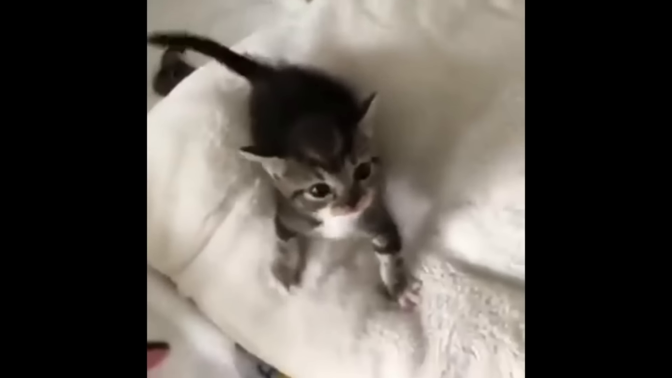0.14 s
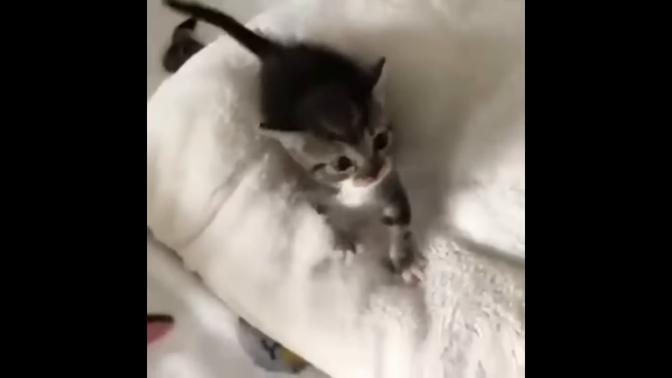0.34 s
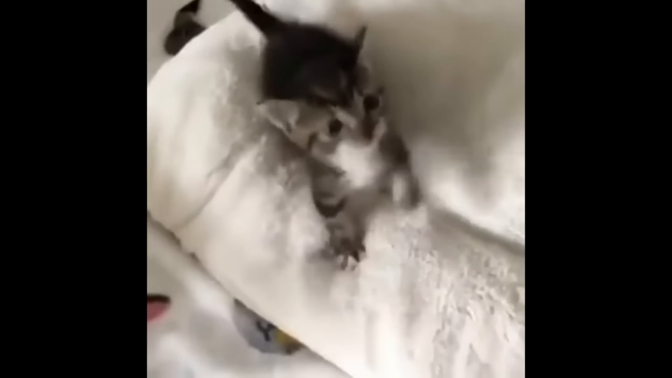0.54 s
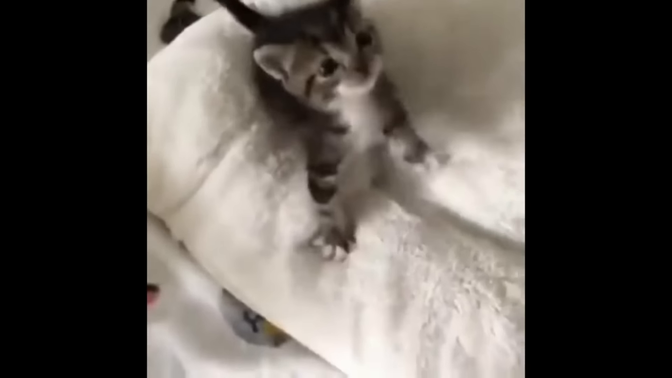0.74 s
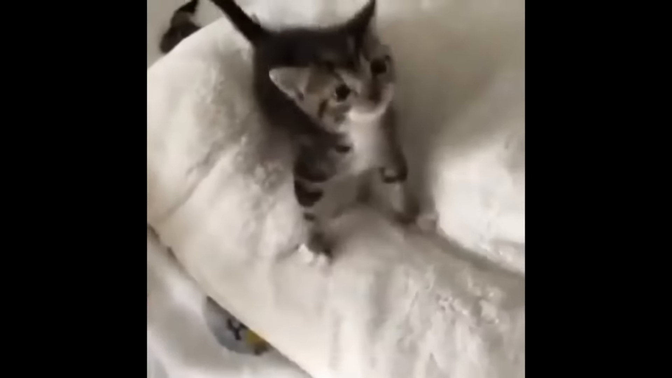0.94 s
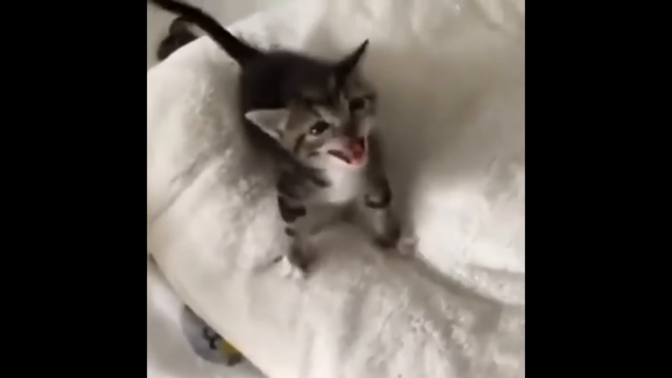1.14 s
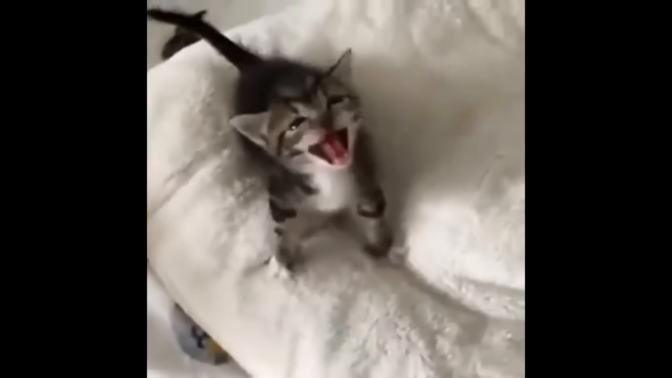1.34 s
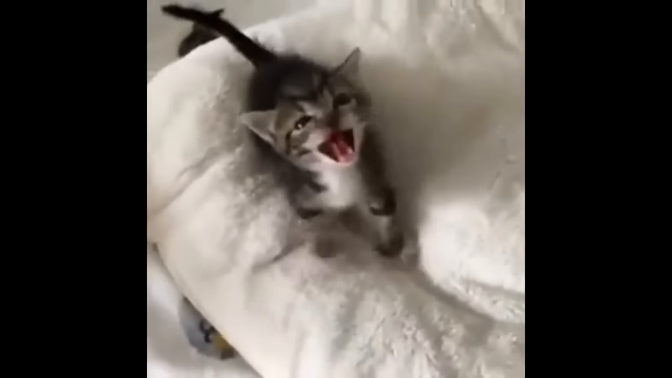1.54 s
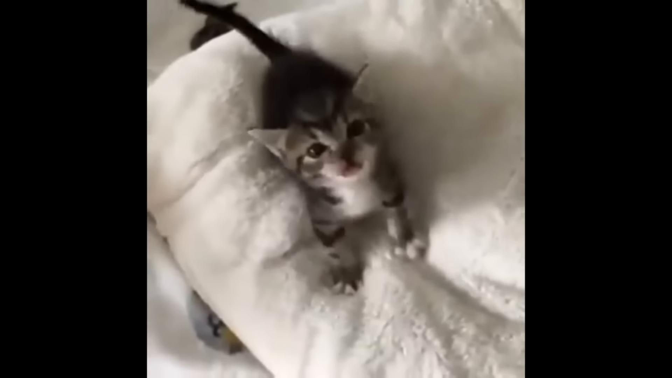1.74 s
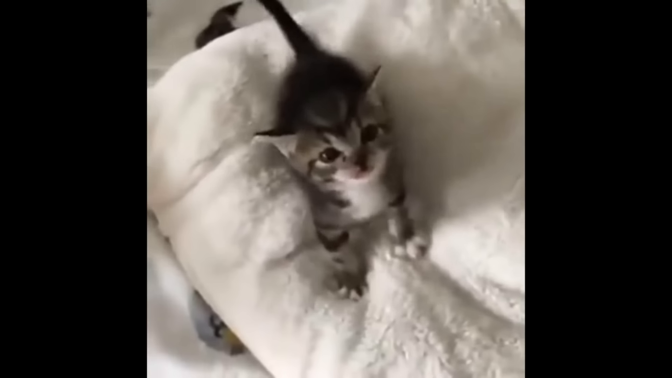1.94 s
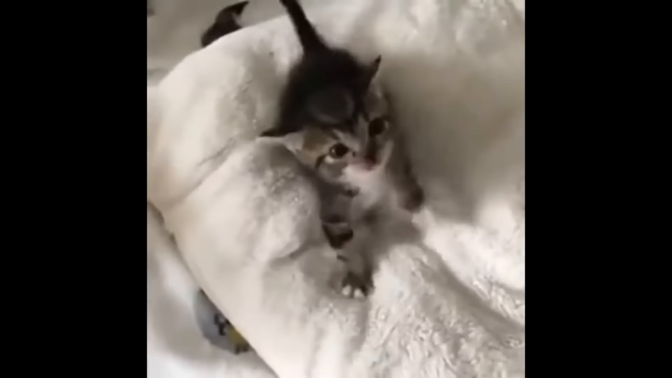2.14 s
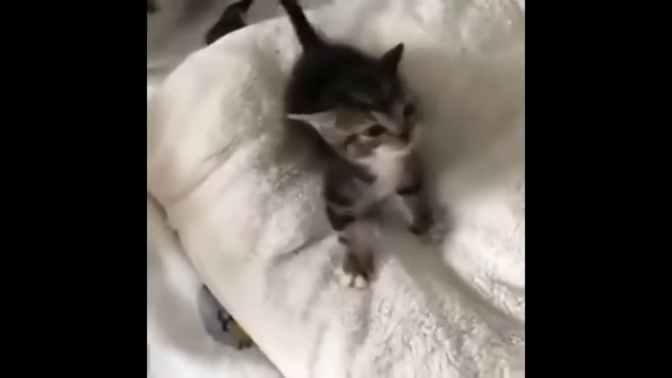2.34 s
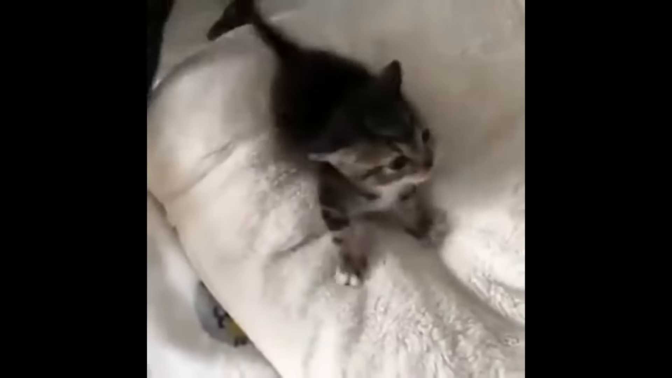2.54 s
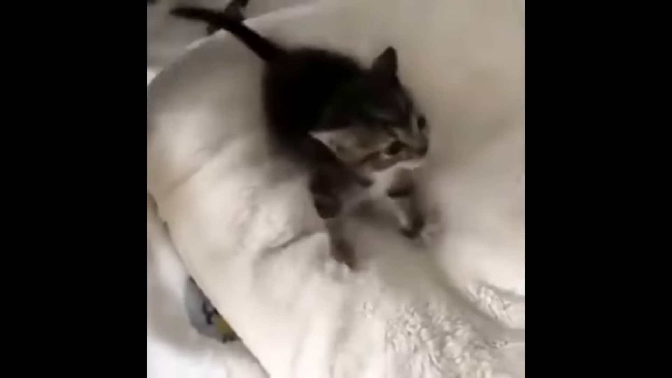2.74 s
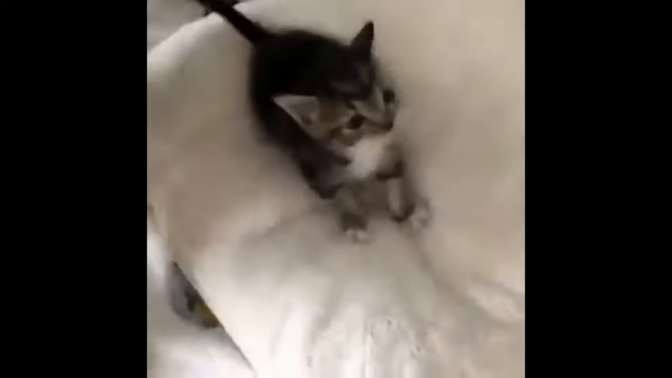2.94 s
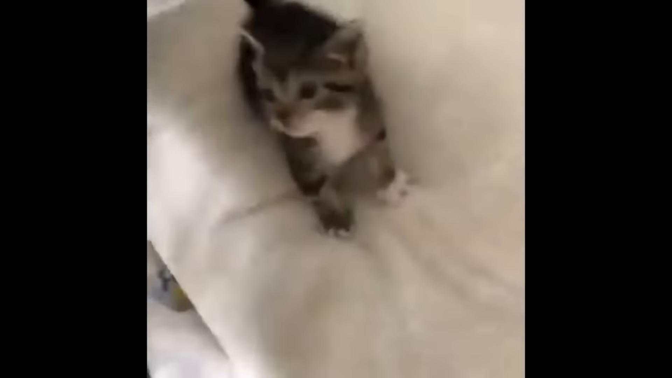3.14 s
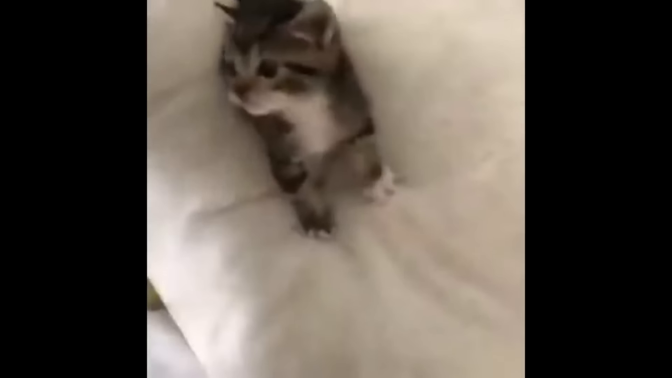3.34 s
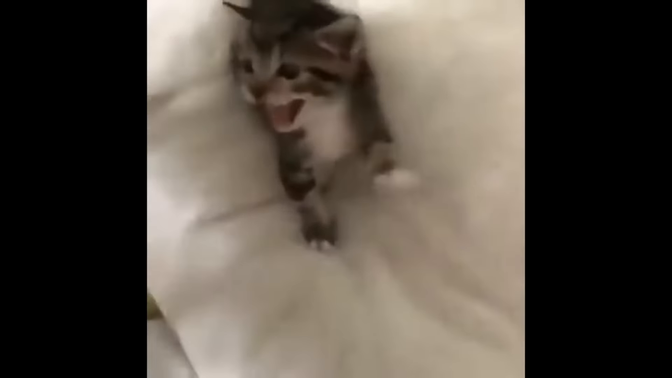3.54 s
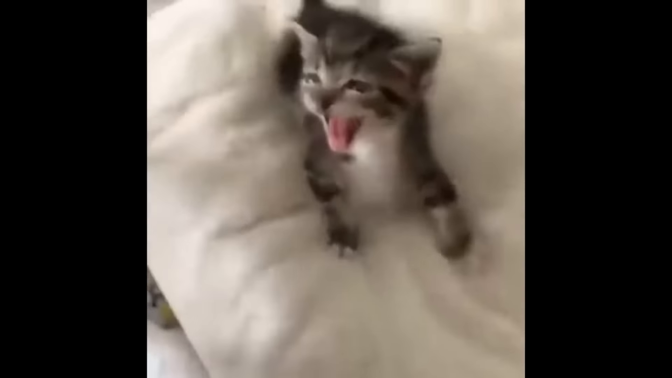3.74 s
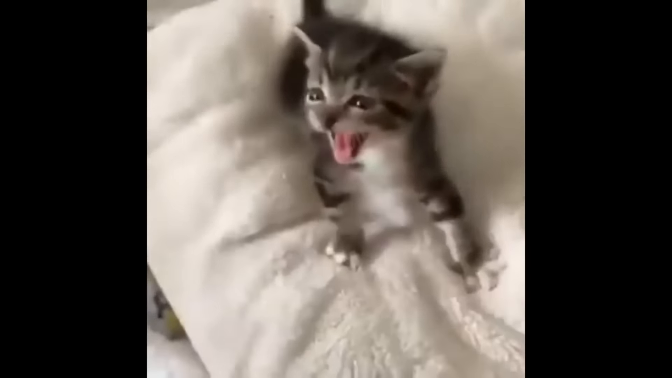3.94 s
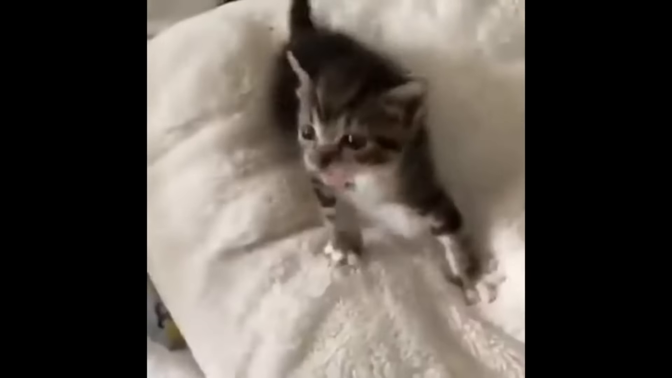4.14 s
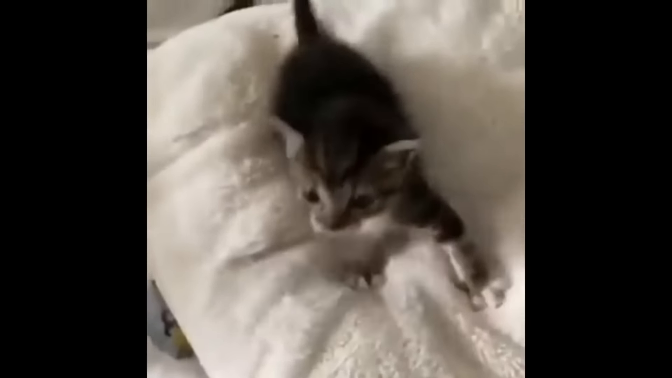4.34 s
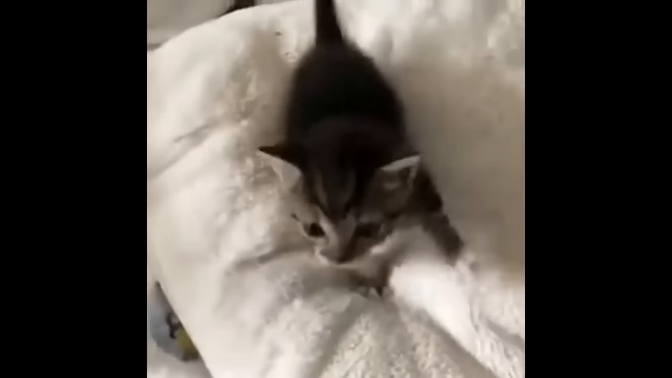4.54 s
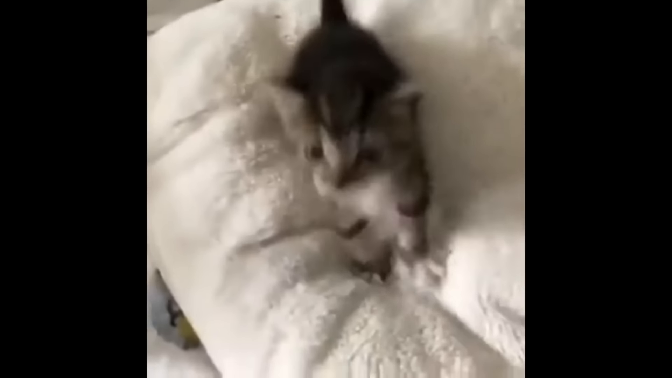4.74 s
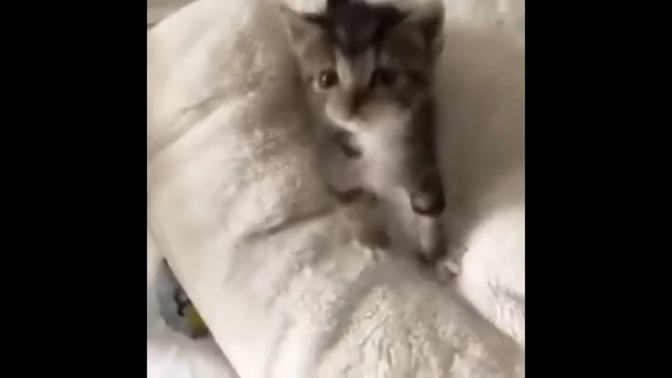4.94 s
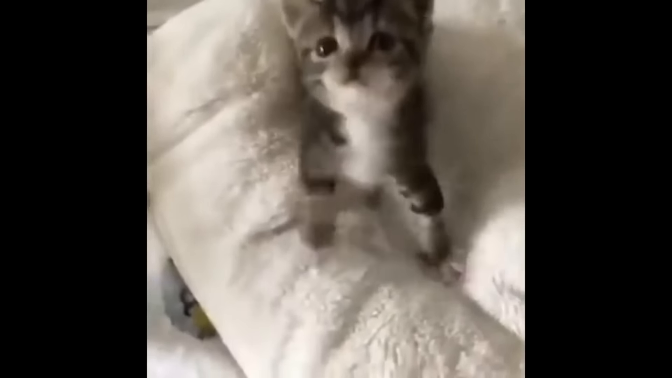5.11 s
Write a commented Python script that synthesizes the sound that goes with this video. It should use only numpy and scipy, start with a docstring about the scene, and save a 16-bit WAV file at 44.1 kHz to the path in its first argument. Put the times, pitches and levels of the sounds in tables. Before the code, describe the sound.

A young kitten gives three shrill high mews close by, the first faint and brief, over a wavering appliance hum in a quiet room.

```python
"""Three shrill mews of a young kitten are heard first and foremost, close by, in a quiet room with a humming appliance.
Harmonics of one unsteady pitch, weighted by throat and mouth, scoop up roughly, hold, dull as the jaw
closes and slide down; the first begins mid-note and the third cracks on the way. Thin, nearly steady
high tones sound during the mews; faint falling tones end and follow the first. Shaped noise gives the rasp,
the paws patting the bedding, claws ticking in the cloth, the room air and the swelling resonances of the hum."""
import sys
import numpy as np
from scipy import signal
from scipy.fft import rfft, irfft, next_fast_len
from scipy.io import wavfile
from scipy.ndimage import uniform_filter1d, minimum_filter1d, map_coordinates

SR = 44100
rng = np.random.default_rng(int(sys.argv[2]) if len(sys.argv) > 2 else 0)


def transcribe(u):
    """Save the signal u as a 16-bit wav file named by the first command-line argument.

    u: samples, shape (n,) or (channels, n), limited to [-1, 1]; the rate is SR.
    q: integer samples, one column per channel.
    """
    v = np.clip(np.atleast_2d(u).T, -1, 1)
    q = np.round(v * 32767).astype(np.int16)
    wavfile.write(sys.argv[1], SR, q)


N = 232583
TIME = np.arange(N) / SR  # s

# One row a mew: scoop_s, slide_s, widest_gape (0-1), jaw_lead_s (closing before the slide),
# accent_db (at the slide), rasp_delay_s (raspiest moment after the scoop), rasp_db
MEW_GESTURES = [(.06, .09, .8, .35, -6, 0.076, -46.5), (.054, .082, 0.81, 0.19, 9, .002, -34.5),
                (.076, .07, 0.97, 0.12, 1.5, 0.081, -28)]
# Pitch of the held note, one curve a mew: time_s, pitch_hz
HELD_PITCH = [
    [(0.0, 1707), (0.049, 1675.0), (0.066, 1697), (0.086, 1770), (0.135, 1787), (0.144, 1672),
     (0.16, 1638.0)],
    [(1.415, 1813), (1.423, 1795), (1.464, 1840), (1.476, 1763), (1.561, 1740), (1.642, 1734),
     (1.812, 1671), (1.845, 1638), (1.857, 1674.0), (1.897, 1644), (1.926, 1737), (1.958, 1647)],
    [(3.828, 1790), (3.848, 1825), (3.88, 1828), (3.901, 1558), (3.913, 1559), (3.949, 1698), (3.969, 1721),
     (4.021, 1711), (4.13, 1630), (4.235, 1679), (4.259, 1641), (4.34, 1611), (4.36, 1706)],
]
# Combined level of the overtones, one curve a mew: time_s, level_db
OVERTONE_EFFORT = [
    [(0.005, -15), (0.061, -13), (0.077, -20.5), (0.085, -38.5), (0.133, -40), (0.145, -23), (0.161, -35),
     (0.177, -44)],
    [(1.365, -48), (1.401, -29), (1.425, -28.5), (1.445, -17.5), (1.549, -11.4), (1.633, -11), (1.673, -13),
     (1.689, -13), (1.785, -16.5), (1.837, -10), (1.877, -29.5), (1.957, -48.5)],
    [(3.76, -38), (3.768, -48), (3.78, -25.5), (3.808, -32.0), (3.824, -20), (3.912, -7.5), (4.072, -8.5),
     (4.084, -11), (4.244, -22.2), (4.268, -19), (4.28, -32), (4.312, -41), (4.36, -47)],
]
# Fundamental as it moves through the lowest throat resonance: frequency_hz, level_db
THROAT_RESONANCE = [(1000, -42.5), (1350, -37.5), (1530, -32.5), (1630, -34), (1680, -30.5), (1715, -38),
                    (1750, -40), (1830, -34)]
# Overtone weighting of the wide mouth: frequency_hz, gain_db
WIDE_MOUTH = [(2000, -17), (3100, -13.5), (3450, -18), (3650, -12), (4100, 2.5), (5500, 0), (6280, 2.5),
              (6520, -10.5), (6650, -39.5), (6980, -36.5), (7300, -13.5), (7600, -45.5), (8850, -41),
              (9150, -20.5)]
# Overtone weighting of the nearly closed mouth: frequency_hz, gain_db
NARROW_MOUTH = [(2000, -4.5), (3320, 2), (3560, -16.5), (4950, -24), (5200, -29), (5350, -16), (6000, -40),
                (9200, -55)]
# Turbulence spectrum in the throat and mouth: frequency_hz, level_db
RASP_SPECTRUM = [(30, -23), (150, -6), (800, -6), (1500, -8), (2050, -7.5), (3900, -12.5), (4500, -11),
                 (5200, -5.5), (5800, -33.5), (6600, 3), (7300, 6.5), (7650, -15), (8600, 7.5), (9400, -45)]
# Hoarse air in one narrow resonance: middle_s, half_length_s, centre_hz, width_hz, level_db
HOARSE_STRETCHES = [(1.385, 0.025, 4650, 700, -41), (1.604, 0.11, 4510, 230, -38),
                    (3.816, 0.035, 4550, 697, -34), (3.905, 0.036, 7280, 282, -23.5),
                    (4.018, 0.092, 8260, 398, -38), (4.11, 0.099, 4100, 218, -44.5)]
# Thin high tones during the mews: start_s, held_s, first_hz, last_hz, level_db
HIGH_TONES = [(0, .16, 6716, 6716, -49.5), (.06, .09, 7190, 7260, -51), (1.465, 0.039, 7330, 7235, -23.5),
              (1.472, 0.23, 9050, 8870, -25.5), (1.49, .02, 6716, 6710, -27),
              (1.534, 0.26, 6710, 6717, -21.5), (1.535, .27, 8480, 8441, -35), (1.55, .11, 7200, 7245, -45),
              (3.891, .027, 8660, 8620, -23.5), (3.947, 0.08, 7061, 7061, -18),
              (3.951, 0.042, 8990, 8920, -32)]
# Faint falling tones, the first mew's second harmonic flaring as it slides, then a thin whine:
# peak_s, rise_s, fade_s, peak_pitch_hz, glide_hz_per_s, level_db
FALLING_TONES = [(.245, 0.025, 0.029, 1980, -15000, -43), (.58, 0.075, 0.25, 1579, -1350, -48)]
# Paws on the bedding: start_s, level_db, t60_s
PAW_PATS = [(1.45, -27, 0.46), (1.688, -35, 0.32), (3.89, -46, 0.45)]
# Spectrum of the bedding's dull give: frequency_hz, level_db
BEDDING_SPECTRUM = [(20, -24), (60, -15), (115, 0), (210, -2), (290, -22), (900, -45)]
# Claws catching in the cloth: middle_s, centre_hz, level_db
CLAW_TICKS = [(2.94, 6300, -52), (3.352, 6300, -44.5)]
# Decay of the room's tail: frequency_hz, t60_s
ROOM_DECAY = [(200, 0.48), (1700, 0.95), (3300, 0.5), (5000, 0.46), (9000, 0.09)]
# Resonances of the hum: centre_hz, width_hz, level_db, swell_share (0-1)
HUM_RESONANCES = [(156, 21, -64, .2), (346, 19, -59.5, 0.79), (420, 55, -60.5, 0.69),
                  (836.4, 45, -53, 0.96), (1614, 50, -61, 0.54)]
# Swelling and fading of the appliance's hum: time_s, level_db
HUM_SWELL = [(0.0, -0.5), (0.1, 9.5), (0.2, -5.5), (0.45, 6.3), (1.0, -5.5), (1.2, 3.5), (1.36, -8),
             (1.71, -4.5), (2.06, 2), (2.61, 0.8), (2.76, -5.5), (3.01, 6), (3.21, 1), (3.56, 2),
             (4.32, -5.5), (4.72, 4), (5.27, -6.5)]
# Spectrum of the room noise: frequency_hz, level_db
AIR_SPECTRUM = [(20, -26), (45, -11), (85, -1), (200, -1), (400, -4), (620, -7), (1350, -10), (2000, -6.5),
                (2600, -10.5), (3000, -9), (4200, -10.5), (6300, -10.7), (6700, -12), (9700, -12.5),
                (11000, -60)]

# Slack folds: the second and third mews start, and all end, at this pitch, this much weaker
REST_HZ, REST_DB = 1008, -13.5
# Random pitch deviation as a share of the pitch: held note, slack folds, rising scoop
HELD_JITTER, SLACK_JITTER, SCOOP_JITTER = .0007, .008, .032
JAW_S = 0.035  # time constant of the closing jaw
SLIDE_DULL_DB = 33  # loss of the overtones by the end of the slide
UPPER_LOSS_DB = 16.5  # fully slack folds lose this for each harmonic above the third
ACCENT_RISE_S, ACCENT_FADE_S = 0.0035, 0.022  # flare of the fundamental about the start of the slide
RASP_RISE_DB_PER_S, RASP_FALL_DB_PER_S = 105.5, 91
HIGH_TONE_ATTACK_S = 0.0079
HIGH_TONE_SAG_DB_PER_S = 17  # from the start
HIGH_TONE_DECAY_DB_PER_S = 270.5  # added after the held time
FALLING_FLOOR_HZ = 1000  # before the jitter
TOP_HZ = 9680  # band limit


def amp(db):
    """A level in decibels is twenty times the logarithm of an amplitude ratio."""
    return 10 ** (np.asarray(db) / 20)


def unit(x):
    """Division by the root mean square normalises a signal to rms 1."""
    return x / np.sqrt(np.mean(x ** 2) + 1e-20)


def along(points, hz):
    """A spectrum is interpolated between (Hz, value) points on a logarithmic frequency axis."""
    f, v = np.transpose(points)
    return np.interp(np.log(hz + 1), np.log(f + 1), v)


def curve(rows):
    """A control curve joins (s, value) points by straight lines with rounded corners."""
    return uniform_filter1d(np.interp(TIME, *np.transpose(rows)), size=200)


def wobble(rate):
    """Random knots, rate of them a second, joined smoothly make a random fluctuation."""
    knots = rng.standard_normal(int(N * rate / SR) + 4)
    return map_coordinates(knots, [TIME * rate])


def filtered(x, response):
    """A linear filter multiplies the spectrum by its frequency response."""
    m = next_fast_len(N + SR // 4)
    hz = np.fft.rfftfreq(m, 1 / SR)
    return irfft(rfft(x, m) * response(hz), m)[:N]


def noise(spectrum):
    """White noise shaped by a spectrum becomes coloured noise, here of rms 1."""
    return unit(filtered(rng.standard_normal(N), lambda hz: amp(along(spectrum, hz))))


def band(centre, width, order=2):
    """A resonance passes a narrow band of noise, of rms 1; a higher order has steeper skirts."""
    def resonance(hz):
        return 1 / (1 + ((hz - centre) / width) ** order)
    return unit(filtered(rng.standard_normal(N), resonance))


def tone(hz):
    """Phase is the running integral of frequency: a sine of rms 1 that follows a pitch curve."""
    return np.sqrt(2) * np.sin(2 * np.pi * np.cumsum(hz) / SR)


def mew(gesture, held, effort, scoop_speed=7, shimmer_db=1.0, stumble_db=4, blur_hz=90, edge_s=.008):
    """Source and filter: fold tension sets the harmonics' pitch, the throat and gape set their balance."""
    scoop_s, slide_s, widest, jaw_lead, accent_db, rasp_delay, rasp_db = gesture
    settle, release = held[0][0], held[-1][0]
    start, end = settle - scoop_s, release + slide_s

    # the folds tighten from rest, hold the note and slacken again
    pitch = curve([(start, REST_HZ), *held, (end, REST_HZ)])
    rising = curve([(start, 1), (settle, 0)])
    sliding = curve([(release, 0), (end, 1)])
    slackening = rising + sliding
    gate = np.clip(1 - np.maximum(start - TIME, TIME - end) / edge_s, 0, 1)
    rest_db = REST_DB * slackening ** 3
    accent_s = np.where(TIME < release, ACCENT_RISE_S, ACCENT_FADE_S)
    accent = np.exp(-((TIME - release) / accent_s) ** 2)
    fundamental = amp(along(THROAT_RESONANCE, pitch) + rest_db + accent_db * accent)

    # the mouth shares the effort out among harmonics 2 to 5
    gape = widest * (1 - np.tanh((TIME - release + jaw_lead) / (2 * JAW_S))) / 2
    upper_db = UPPER_LOSS_DB * np.sqrt(np.abs(slackening))
    mouth_db = []
    for k in range(2, 6):
        wide_db = gape * along(WIDE_MOUTH, k * pitch)
        narrow_db = (1 - gape) * along(NARROW_MOUTH, k * pitch)
        mouth_db.append(wide_db + narrow_db - max(k - 3, 0) * upper_db)
    mouth = amp(mouth_db)
    shares = mouth / np.linalg.norm(mouth, axis=0)
    overtones = amp(curve(effort) + rest_db / 2 - SLIDE_DULL_DB * sliding) * shares
    gains = [fundamental, *overtones]

    # the rasp builds to a peak and then clears
    since = TIME - settle - rasp_delay
    rasp_fade_db = np.maximum(-RASP_RISE_DB_PER_S * since, RASP_FALL_DB_PER_S * since)
    rasp = amp(rasp_db + rest_db - rasp_fade_db)

    # weakly driven folds vibrate less evenly
    slack = 1 / (1 + np.linalg.norm(gains, axis=0) / amp(-34))
    # tightening folds stumble: the faster the rise, the rougher, up to scoop_speed octaves a second
    octaves_per_s = np.gradient(np.log2(pitch)) * SR
    scoop = np.clip(octaves_per_s / scoop_speed, 0, 1) ** 2 * np.sqrt(np.clip(2 * rising, 0, 1))
    jitter = (HELD_JITTER + SLACK_JITTER * slack) * wobble(450) + SCOOP_JITTER * scoop * wobble(900)
    pitch = pitch * (1 + jitter)

    voice = 0
    for k, gain in enumerate(gains, 1):
        # a harmonic no stronger than the rasp breaks up
        buried = rasp ** 2 / (rasp ** 2 + gain ** 2 + 1e-20)
        broken = np.max([scoop, slack, buried], axis=0)
        flutter_db = shimmer_db * wobble(120) + stumble_db * broken * (.5 - np.abs(wobble(200)))
        blurred_hz = k * pitch + blur_hz * buried * wobble(700)
        voice = voice + gain * amp(flutter_db) * tone(blurred_hz)

    # air rasps through the folds once a cycle, in uneven gusts
    puffs = unit(1 + .2 * tone(pitch)) * amp(1.5 * wobble(90))
    return gate * (voice + rasp * puffs * noise(RASP_SPECTRUM))


def hoarseness():
    """Turbulent air excites one narrow resonance at a time, swelling and fading smoothly."""
    out = np.zeros(N)
    for middle, half, centre, width, db in HOARSE_STRETCHES:
        swell = np.exp(-((TIME - middle) / half) ** 2)
        out += amp(db) * swell * band(centre, width, order=6)
    return out


def high_tones(waver_db=2.0):
    """A thin sine of nearly steady pitch enters quickly, sags slowly and then decays exponentially."""
    out = np.zeros(N)
    for start, held, first_hz, last_hz, db in HIGH_TONES:
        age = np.maximum(TIME - start, 0)
        decay_db = HIGH_TONE_DECAY_DB_PER_S * np.maximum(age - held, 0)
        fade_db = HIGH_TONE_SAG_DB_PER_S * age + decay_db
        hz = np.interp(age, [0, held], [first_hz, last_hz]) * (1 + .0002 * wobble(200))
        attack = np.minimum(age / HIGH_TONE_ATTACK_S, 1)
        out += attack * amp(db - fade_db + waver_db * wobble(50)) * tone(hz)
    return out


def falling_tones(jitter=.01, shimmer_db=3.5):
    """Frequency and amplitude modulation: a faint unsteady sine swells and fades as it glides down."""
    out = np.zeros(N)
    for peak, rise, fade, hz, glide, db in FALLING_TONES:
        age = TIME - peak
        swell = np.exp(-(age / np.where(age < 0, rise, fade)) ** 2)
        pitch = np.maximum(hz + glide * age, FALLING_FLOOR_HZ) * (1 + jitter * wobble(260))
        out += swell * amp(db + shimmer_db * wobble(69.2)) * tone(pitch)
    return out


def room(x):
    """Reverberation: a short diffuse tail in which each frequency decays at its own rate."""
    hz, t, grains = signal.stft(rng.standard_normal(SR // 2), SR, nperseg=256)
    decay = amp(-60 * t / along(ROOM_DECAY, hz)[:, None])
    tail = signal.istft(grains * decay, SR, nperseg=256)[1]
    delayed = np.pad(tail, (200, 0))  # samples before the first reflection
    return signal.fftconvolve(x, delayed / np.linalg.norm(tail))[:N]


def paws(attack_s=0.014):
    """A soft impact on damped bedding: low noise rises quickly and decays exponentially."""
    out = np.zeros(N)
    for start, db, t60 in PAW_PATS:
        age = np.maximum(TIME - start, 0)
        onset = 1 - np.exp(-age / attack_s)
        out += amp(db - 60 * age / t60) * onset * noise(BEDDING_SPECTRUM)
    return out


def claws(width_hz=300, length_s=.008):
    """A plucked thread gives one tiny bright tick, a brief pulse of narrow-band noise."""
    out = np.zeros(N)
    for middle, centre, db in CLAW_TICKS:
        pulse = np.exp(-((TIME - middle) / length_s) ** 2)
        out += amp(db) * pulse * band(centre, width_hz)
    return out


def background():
    """Narrow resonances of an appliance swell together and waver singly over broadband room noise."""
    swell_db = curve(HUM_SWELL)
    hum = 0
    for centre, width, db, share in HUM_RESONANCES:
        waver_db = 1.2 * wobble(9)
        hum = hum + amp(db + share * swell_db + waver_db) * band(centre, width)
    air = amp(-47 + .5 * wobble(6)) * noise(AIR_SPECTRUM)
    return hum + air


def scene():
    """Superposition: the kitten's direct sound, its reverberation, the bedding and the background add."""
    mews = sum(mew(*parts) for parts in zip(MEW_GESTURES, HELD_PITCH, OVERTONE_EFFORT))
    near = mews + hoarseness() + high_tones() + falling_tones()
    echo = amp(-21.5) * room(near)
    return (near + echo + paws() + claws() + background())[None]


def record(dry):
    """Peak limiting lowers the gain briefly around the loudest peaks; a steep low-pass limits the band."""
    needed = np.minimum(1, .88 / (np.abs(dry[0]) + 1e-9))
    gain = uniform_filter1d(minimum_filter1d(needed, size=400), size=400)
    return filtered(dry[0] * gain, lambda hz: 1 / (1 + (hz / TOP_HZ) ** 200))[None]


dry = scene()
out = record(dry)
transcribe(out)
```